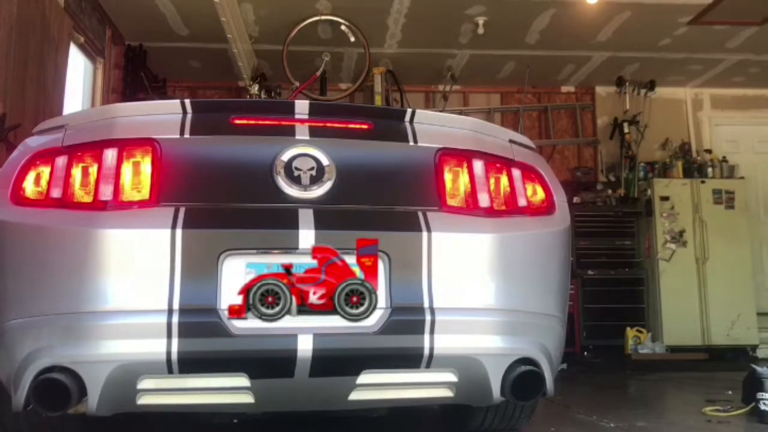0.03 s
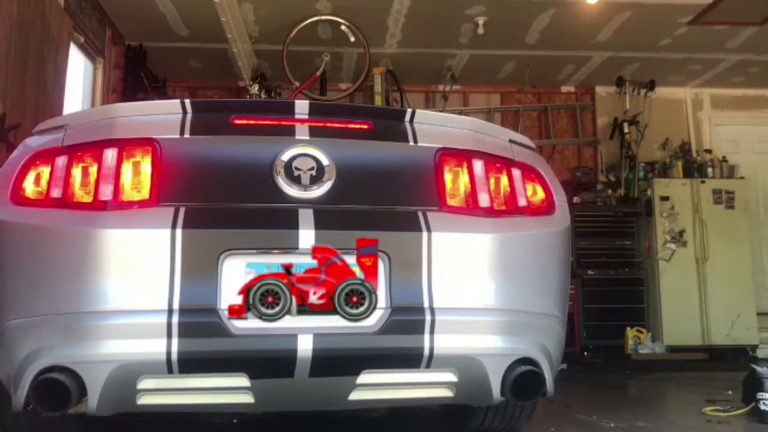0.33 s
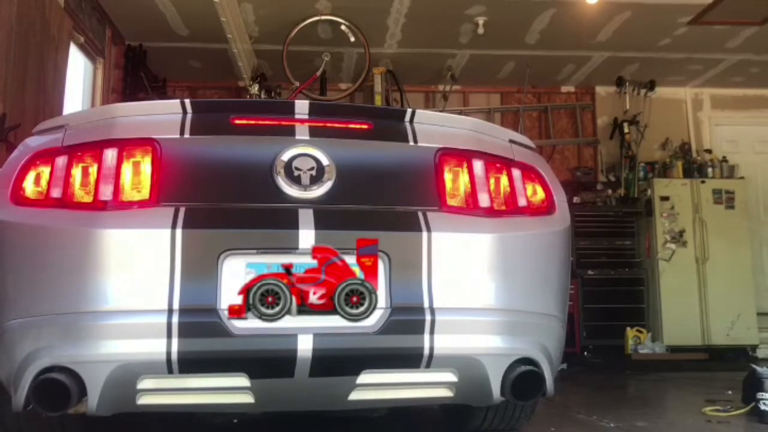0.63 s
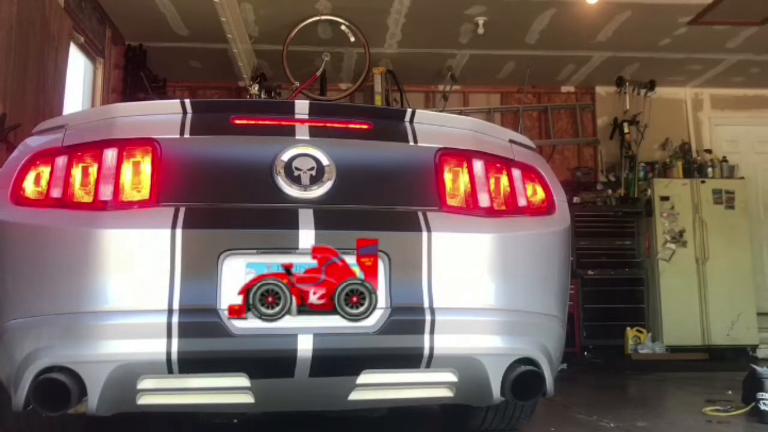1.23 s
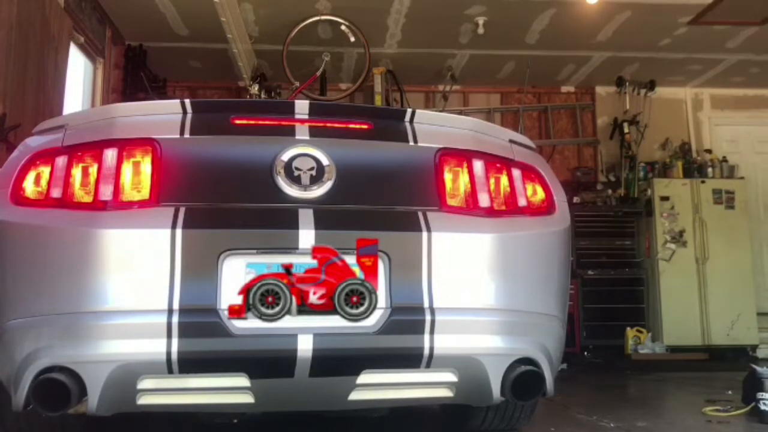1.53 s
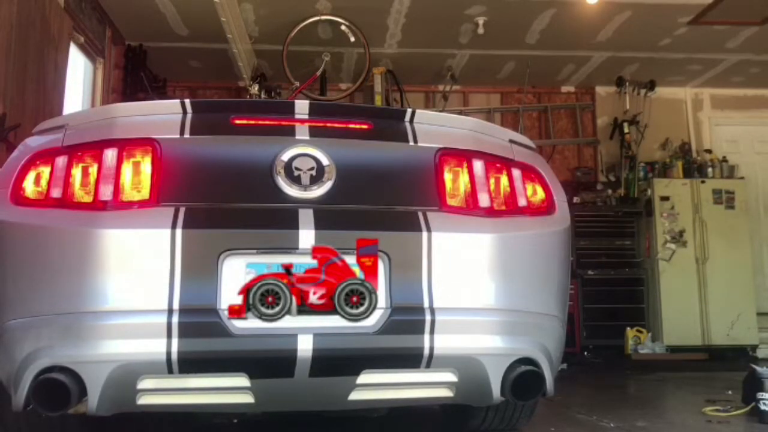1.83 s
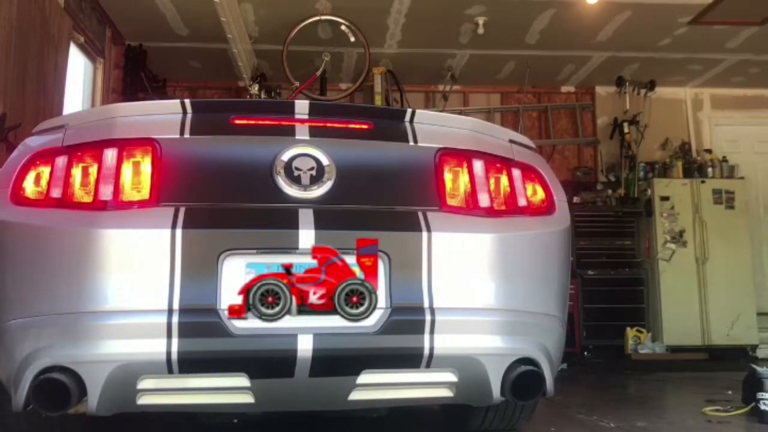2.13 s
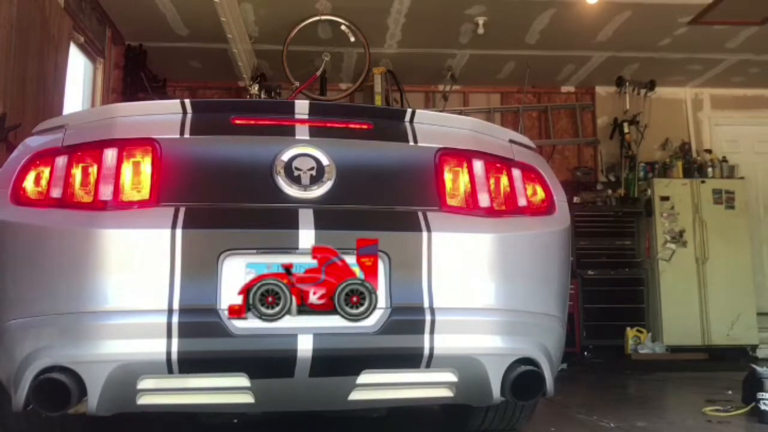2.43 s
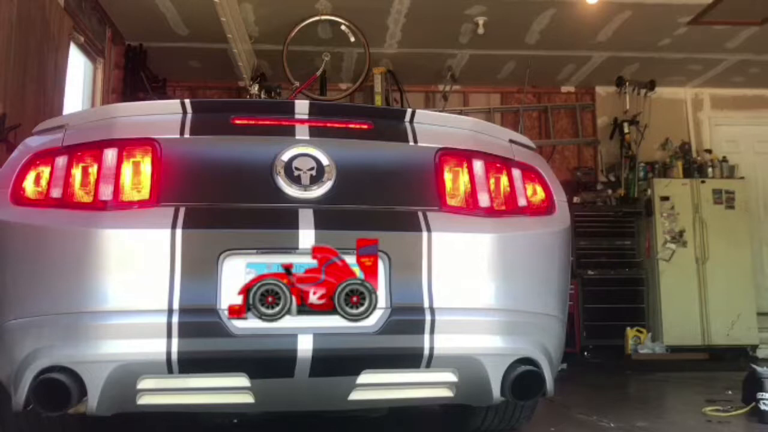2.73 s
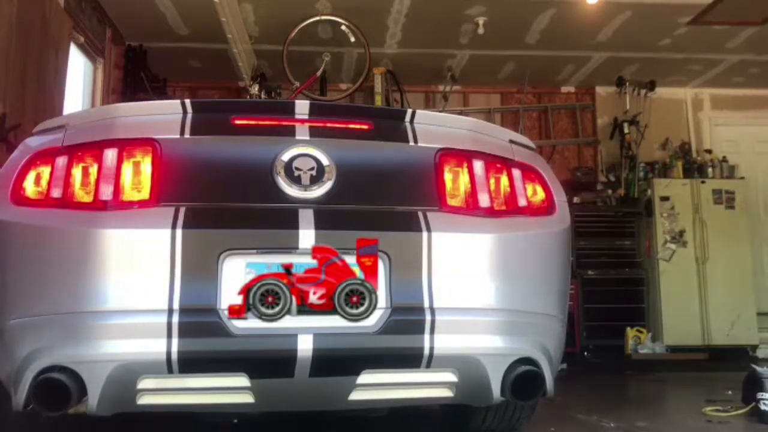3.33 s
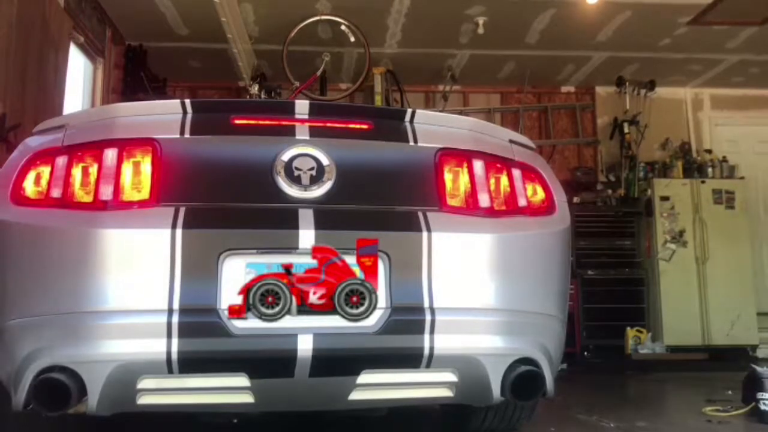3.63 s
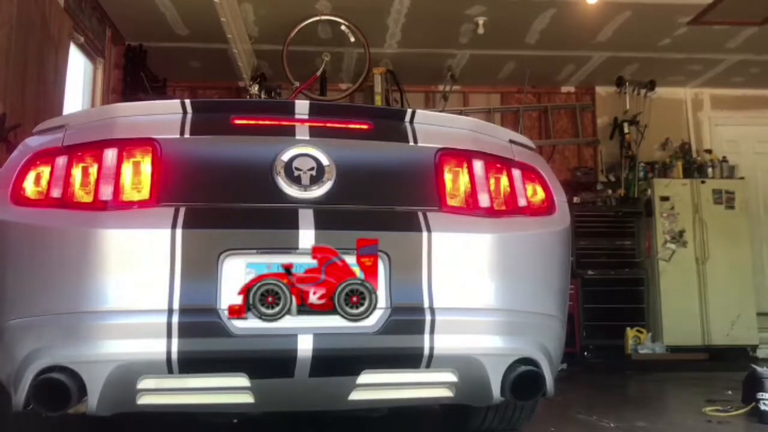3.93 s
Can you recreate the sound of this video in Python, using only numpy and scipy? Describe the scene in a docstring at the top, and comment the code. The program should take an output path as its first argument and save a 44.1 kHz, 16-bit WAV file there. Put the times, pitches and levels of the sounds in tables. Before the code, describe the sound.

A V8 car engine cranks and starts with a loud roar in a garage.

```python
"""A relay clicks over a low room rumble and a fuel pump primes: a V8's cold start in a garage,
heard from behind its tailpipes. The starter slams in and grinds through seven compressions.
The engine catches with a boom and a spit of gas, flares to the point of overload and sinks towards
a lumpy fast idle. Each firing is a pulse that rings pipes and silencer and lets out a noisy puff."""
import sys
import numpy as np
from scipy import signal
from scipy.fft import rfft, irfft
from scipy.io import wavfile
from scipy.ndimage import uniform_filter1d

SR = 44100
rng = np.random.default_rng(int(sys.argv[2]) if len(sys.argv) > 2 else 0)


def transcribe(u):
    """Save the signal u as a 16-bit wav file named by the first command-line argument.

    u: samples, shape (n,) or (channels, n), limited to [-1, 1]; the rate is SR.
    q: integer samples, one column per channel.
    """
    v = np.clip(np.atleast_2d(u).T, -1, 1)
    q = np.round(v * 32767).astype(np.int16)
    wavfile.write(sys.argv[1], SR, q)


N = 176400
T = np.arange(N) / SR

# room rumble: freq_hz, gain_db
ROOM_SPECTRUM = [(20, -43), (32, -9), (55, 0), (80, 0.5), (130, -10.5), (200, -18), (290, -22), (400, -17),
                 (560, -25.5), (750, -29.5), (1100, -32), (2000, -40), (3750, -36.5), (7500, -45),
                 (15500, -54.5)]
# room rumble: time_s, level_db
ROOM_LEVEL = [(0, -50.5), (1.4, -57.5), (1.7, -53), (2.3, -55)]
# steady hum: pitch_hz, level_db
HUM_PARTIALS = [(91.5, -60), (150.7, -68), (231.5, -71.5), (274.5, -67.5), (306.8, -71), (554.5, -75)]
# faint squeaks: start_s, length_s, start_pitch_hz, level_db
SQUEAKS = [(0.049, 0.34, 4360, -69.5), (.07, .08, 6160, -70), (0.348, 0.068, 6200, -63),
           (1.72, 0.24, 4440, -66)]

# relay and valve clicks: start_s, level_db
RELAY_CLICKS = [(.334, -51.5), (.42, -54.5), (1.503, -51)]
# one click: freq_hz, gain_db
RELAY_SPECTRUM = [(200, -9), (400, -1), (540, 7.5), (750, -1.5), (1200, -3.5), (2300, -10.5), (4000, -16),
                  (12000, -30)]
# fuel flow: freq_hz, gain_db
FUEL_SPECTRUM = [(180, -49), (300, -28), (372, 1), (404, -7), (468, -4), (781, -11), (1490, -8),
                 (1620, -11), (2040, -9.5), (3280, -9), (4070, -3), (5130, -8.5), (10400, -14),
                 (13100, -14.5), (15500, -23)]
# pump resonances: freq_hz, width_hz, gain_db
PUMP_MODES = [(2040, 77, 3), (4120, 170, 0)]
# soft thumps in the body: start_s, level_db
BODY_THUMPS = [(1.25, -48.5), (1.42, -44)]

# compressions loading the starter: centre_s, boost_db
COMPRESSIONS = [(2.35, 4), (2.458, 4), (2.566, 6), (2.676, 2), (2.757, 7), (2.84, 8), (2.926, 7)]
# starter gear noise: freq_hz, gain_db
GEAR_SPECTRUM = [(100, -16), (230, -5), (400, -0.5), (750, -3), (1500, -5), (2500, -3.5), (4000, -11.5),
                 (6500, -14.5), (8000, -22), (12500, -24.5), (15500, -39)]
# starter housing resonances: freq_hz, width_hz, gain_db
HOUSING_MODES = [(383, 43, 7), (980, 110, -10), (1474, 39, -4), (1950, 81, 2), (2360, 93, 1),
                 (3250, 230, -4.5)]
# pinion impact: freq_hz, gain_db
CLASH_SPECTRUM = [(80, -32.5), (140, 15), (230, -12), (400, 2), (1500, 1.5), (2700, 9.5), (4000, -4),
                  (6000, -2.5), (9000, -8), (15500, -12)]
# air pumped through the pipes while cranking: time_s, level_db
CRANKING_AIR = [(2.32, -69), (2.5, -50), (2.55, -35.5), (2.72, -33.5), (2.8, -38.5), (2.92, -36.5),
                (2.98, -21), (3.03, -37)]

# crankshaft from the first firing on: time_s, speed_rpm
CRANK_SPEED = [(2.988, 509.0), (3.04, 719.0), (3.14, 1336.0), (3.23, 1678.0), (3.32, 1735.0),
               (3.45, 1722.0), (3.6, 1641.0), (3.72, 1507.0), (3.83, 1454.0), (4.0, 1383.0)]
# cylinders in firing order, at full imbalance: gain_db
CYLINDERS_DB = [-12, 1, 0, -3, -10, -3, 2, -3]
# imbalance rises, peaks and eases: time_s
IMBALANCE_TIMES_S = [3.18, 3.32, 3.6, 3.8]
# exhaust layers before trim: time_s, boom_db, drone_db, bark_db, rasp_db, hiss_db
EXHAUST_LEVELS = [(2.98, -23, -35, -34, -34, -38), (2.988, -32, -51, -33, -47, -34),
                  (3.008, -13.5, -8, -26, -35, -33), (3.014, -14.5, -25.5, -23.5, -40.5, -27.5),
                  (3.07, -8.5, -20, -10, -29, -26.5), (3.092, -10.5, -8.5, -10, -27, -29),
                  (3.118, -18, -10.5, -10.5, -39, -25), (3.186, -15, -23.5, -4.5, -20, -36.5),
                  (3.218, -21, -13.5, -10.5, -29, -32.5), (3.302, -34, -18.5, -10, -34, -40),
                  (3.346, -23, -15, -15.5, -36, -42.5), (3.374, -26, -13.5, -13.5, -33.5, -46),
                  (3.596, -27.5, -14, -21, -55, -53.5), (3.7, -28.5, -19.5, -28, -59, -57),
                  (3.892, -28.5, -17.5, -26.5, -54.5, -56), (4.0, -39, -19.5, -31, -57, -61.5)]
# layer trims: boom_db, drone_db, bark_db, rasp_db, hiss_db
EXHAUST_TRIMS_DB = [0.5, 0, 0.34, 1.5, 0.31]
# pipe resonances: freq_hz, width_hz, gain_db
PIPE_MODES = [(237, 42, 0.5), (268, 42, 0), (349, 27, -4.5), (418, 34, 1.5), (471.5, 15, 6), (608, 14, 0),
              (738, 8.1, 3), (888, 11, 10), (1218, 31, 10)]
# low resonances of silencer and garage: freq_hz, width_hz, gain_db
BOOM_MODES = [(54.3, 5.9, 5.5), (67.8, 12.4, 1), (103.1, 4.7, -5.5), (132, 6.3, -2)]
# low pipe drone: freq_hz, gain_db
DRONE_SPECTRUM = [(60, -23.5), (130, -18), (175, -8.5), (240, 0), (350, 1.5), (480, -0.5), (650, -8),
                  (1000, -50)]
# bark of a firing: freq_hz, gain_db
BARK_SPECTRUM = [(120, -15.5), (280, -7.5), (400, 0), (500, 3.5), (620, -6.5), (760, -11), (900, -21.5),
                 (1100, -28), (1400, -33), (3000, -58)]
# gas rasp: freq_hz, gain_db
RASP_SPECTRUM = [(450, -11), (620, 9.5), (800, 7), (1000, 0.5), (1250, 0.5), (1700, -4), (2600, -8.5),
                 (3500, -18.5), (6000, -25.5)]
# gas hiss: freq_hz, gain_db
HISS_SPECTRUM = [(2500, -1), (4400, -12), (5300, 4), (7000, -10), (8600, -2), (10500, -10), (12000, -0.5),
                 (15500, -9.5)]
# sharp exhaust cracks: start_s, level_db
EXHAUST_CRACKS = [(3.149, -16), (3.1805, -7), (3.2903, -13.5)]

# short spectra: freq_hz, gain_db
FLUTTER_SPECTRUM = [(30, -3), (300, -4.5), (900, -25)]
THUMP_SPECTRUM = [(20, -34), (42, -5.5), (95, -8), (200, -25.5), (600, -45)]
SOLENOID_SPECTRUM = [(90, -27), (125, -6), (142, 2), (160, -7), (220, -28.5)]
CRANKING_SPECTRUM = [(45, -8), (75, 5), (100, -9), (150, -12)]
BOOM_BAND = [(40, 0), (150, 0)]
CRACK_SPECTRUM = [(700, -4), (1500, 2), (2700, 7), (4200, -25), (7000, -41)]

FUEL_ON_S, FUEL_OFF_S, THROB_HZ, THROB_DB, THROB_DECAY_S = 0.484, 1.484, 7.9, 4.5, 0.45
MOTOR_HZ, MOTOR_WIDTH_HZ = 76, 14
STARTER_ON_S, STARTER_OFF_S, SOLENOID_S, SOLENOID_DB = 2.312, 3.0, 2.33, -35.5
MESH_HZ, MESH_SAG, TOOTH_JITTER_S, TOOTH_SPREAD_DB = 498, .04, .00009, 4
COMPRESSION_SIGMA_S, AIR_HZ = .02, 53
FIRING_SPREAD_DB, FIRING_JITTER_S, VALVE_LEAD_S = 2.5, 0.0004, 0.001208
GARAGE_T60_S, CUTOFF_HZ = 0.57, 15900


def from_db(db):
    """Decibels to gain."""
    return 10 ** (np.asarray(db) / 20)


def unit_rms(x):
    """Scale to rms 1."""
    return x / np.sqrt(np.mean(x ** 2) + 1e-20)


def hold_rms(x):
    """Hold the running rms near 1."""
    power = uniform_filter1d(x * x, size=3000)
    return x / np.sqrt(np.abs(power) + .01 * np.mean(x * x))


def curves(rows):
    """Each value column of a timed table, at every sample."""
    times_s, *columns = np.transpose(rows)
    return [np.interp(T, times_s, column) for column in columns]


def colour(x, spectrum):
    """Minimum-phase filter; falls 28.4 dB an octave beyond the spectrum's ends."""
    size = 2 ** 14
    hz, db = np.transpose(spectrum)
    octave = np.log2(np.maximum(np.arange(size // 2 + 1) * SR / size, 1))
    beyond = np.maximum(np.log2(hz[0]) - octave, 0) + np.maximum(octave - np.log2(hz[-1]), 0)
    gain_db = np.interp(octave, np.log2(hz), db) - 28.4 * beyond
    cepstrum = irfft(np.log(from_db(gain_db)))
    cepstrum[1:size // 2] *= 2  # fold onto positive time
    cepstrum[size // 2 + 1:] = 0
    return signal.fftconvolve(x, irfft(np.exp(rfft(cepstrum))))[:N]


def noise(spectrum):
    """Coloured noise of rms 1."""
    return unit_rms(colour(rng.standard_normal(N), spectrum))


def resonate(x, modes):
    """Parallel two-pole resonances."""
    out = 0
    for hz, width_hz, db in modes:
        r = np.exp(-np.pi * width_hz / SR)
        poles = [1, -2 * r * np.cos(2 * np.pi * hz / SR), r * r]
        out = out + from_db(db) * (1 - r * r) / 2 * signal.lfilter([1, 0, -1], poles, x + 1e-18)
    return out


def impulses(times_s, gains):
    """One impulse at each time."""
    return np.bincount(np.clip(times_s * SR, 0, N).astype(int), gains, N + 1)[:N]


def die_away(x, decay_s):
    """Each impulse becomes an exponential decay."""
    return signal.lfilter([1], [1, -np.exp(-1 / (decay_s * SR))], x + 1e-18)


def bursts(events, spectrum, decay_s):
    """Decaying bursts of coloured noise."""
    start_s, level_db = np.transpose(events)
    return die_away(impulses(start_s, from_db(level_db)), decay_s) * noise(spectrum)


def gate(on_s, off_s, attack_s, release_s):
    """Linear attack, hold, exponential release."""
    return np.clip((T - on_s) / attack_s, 0, 1) * np.exp(-np.maximum(T - off_s, 0) / release_s)


def garage(x, wet_db):
    """Direct sound plus a diffuse tail after 8 ms."""
    t = T[:SR // 2]
    tail = rng.standard_normal(len(t)) * from_db(-60 * t / GARAGE_T60_S) * (t > .008)
    return x + from_db(wet_db) * signal.fftconvolve(x, tail / np.linalg.norm(tail))[:N]


def treble_ripple(x, decay_s=.012, above_hz=3000):
    """A short random filter gives the treble a faint ringing colour."""
    t = T[:SR // 20]
    kernel = rng.standard_normal(len(t)) * np.exp(-t / decay_s)
    treble = signal.sosfilt(signal.butter(2, above_hz, "high", fs=SR, output="sos"), x)
    return 0.73 * x + .35 * signal.fftconvolve(treble, kernel / np.linalg.norm(kernel))[:N]


def background():
    """Low room rumble, a steady hum and faint falling squeaks."""
    hum = sum(from_db(db) * np.sqrt(2) * np.sin(2 * np.pi * (hz * T + rng.random()))
              for hz, db in HUM_PARTIALS)
    out = noise(ROOM_SPECTRUM) * from_db(curves(ROOM_LEVEL)[0]) + hum
    flutter = noise(FLUTTER_SPECTRUM)
    for start_s, length_s, start_hz, db in SQUEAKS:
        progress = np.clip((T - start_s) / length_s, 0, 1)
        pitch_hz = start_hz * (1 - 0.26 * progress)
        tone = np.sin(2 * np.pi * np.cumsum(pitch_hz) / SR)
        out += from_db(db) * np.sin(np.pi * progress) * flutter * tone
    return out


def priming():
    """Relays click, the body thumps; the fuel pump drones and hisses, throbbing until pressure is up."""
    age_s = np.maximum(T - FUEL_ON_S, 0)
    throb_db = THROB_DB * np.exp(-age_s / THROB_DECAY_S) * np.sin(2 * np.pi * THROB_HZ * (age_s - .02))
    flow = noise(FUEL_SPECTRUM)
    hiss = from_db(-55 + throb_db) * unit_rms(treble_ripple(flow + resonate(flow, PUMP_MODES)))
    hiss *= gate(FUEL_ON_S, FUEL_OFF_S, attack_s=0.0057, release_s=0.038)
    motor = from_db(-53.5) * unit_rms(resonate(rng.standard_normal(N), [(MOTOR_HZ, MOTOR_WIDTH_HZ, 0)]))
    motor *= gate(FUEL_ON_S, FUEL_OFF_S, attack_s=0.036, release_s=.03)
    clicks = bursts(RELAY_CLICKS, RELAY_SPECTRUM, decay_s=0.049)
    thumps = bursts(BODY_THUMPS, THUMP_SPECTRUM, decay_s=0.14)
    return hiss + motor + clicks + thumps


def starter_gears():
    """Teeth rattle the housing, louder and slower at each compression."""
    load_db = sum(db * np.exp(-.5 * ((T - s) / COMPRESSION_SIGMA_S) ** 2) for s, db in COMPRESSIONS)
    tooth_count = np.cumsum(MESH_HZ * (1 - MESH_SAG * load_db / load_db.max())) / SR
    tooth_s = np.interp(np.arange(int(tooth_count[-1])), tooth_count, T)
    jitter, spread = rng.standard_normal((len(tooth_s), 2)).T
    strikes = impulses(tooth_s + TOOTH_JITTER_S * jitter, from_db(TOOTH_SPREAD_DB * spread))
    whine = from_db(-33.5) * unit_rms(colour(strikes, GEAR_SPECTRUM))
    grind = from_db(-30.5) * noise(GEAR_SPECTRUM)
    drive = (whine + grind) * from_db(load_db)
    drive *= gate(STARTER_ON_S, STARTER_OFF_S, attack_s=0.022, release_s=0.2)
    return garage(drive + resonate(drive, HOUSING_MODES), wet_db=-3) / 2


def starter():
    """The pinion slams in, the solenoid thuds; the cranked engine rumbles and pumps air."""
    gears = starter_gears()
    clash = from_db(-26.5) * noise(CLASH_SPECTRUM)
    clash *= gate(STARTER_ON_S, STARTER_ON_S + 0.034, attack_s=0.0067, release_s=0.045)
    air = from_db(curves(CRANKING_AIR)[0]) * np.sqrt(2) * np.sin(2 * np.pi * AIR_HZ * T)
    air *= gate(STARTER_ON_S, STARTER_OFF_S, attack_s=.02, release_s=0.067)
    rumble = from_db(-44.5) * noise(CRANKING_SPECTRUM)
    rumble *= gate(STARTER_ON_S, STARTER_OFF_S, attack_s=0.067, release_s=.05)
    thud = bursts([(SOLENOID_S, SOLENOID_DB)], SOLENOID_SPECTRUM, decay_s=0.062)
    return treble_ripple(gears + clash) + air + rumble + thud


def firing_pulses(running):
    """Four pulses a crank turn, uneven in time and strength."""
    firing_count = np.cumsum(curves(CRANK_SPEED)[0] * running) * 4 / 60 / SR
    index = np.arange(int(firing_count[-1]) + 1)
    jitter, spread = rng.standard_normal((len(index), 2)).T
    firing_s = np.interp(index, firing_count[running], T[running]) + FIRING_JITTER_S * jitter
    imbalance = np.interp(firing_s, IMBALANCE_TIMES_S, [0.17, 1, 0.63, 0.31])
    gain_db = imbalance * np.resize(CYLINDERS_DB, len(index)) + FIRING_SPREAD_DB * spread
    return impulses(firing_s - VALVE_LEAD_S, from_db(gain_db))


def engine():
    """Firings ring pipes and silencer and puff out rasping, hissing gas; the exhaust cracks sharply."""
    running = T >= CRANK_SPEED[0][0]
    pulses = firing_pulses(running)
    pipes = garage(-pulses - resonate(pulses, PIPE_MODES), wet_db=-5.5)
    gas_flow = die_away(pulses, decay_s=0.0031) + .15 * running
    boom = resonate(colour(-pulses, BOOM_BAND), BOOM_MODES)
    drone = colour(pipes, DRONE_SPECTRUM)
    bark = colour(pipes, BARK_SPECTRUM)
    rasp = garage(treble_ripple(gas_flow * noise(RASP_SPECTRUM)), wet_db=-0.5)
    hiss = garage(treble_ripple(gas_flow * noise(HISS_SPECTRUM)), wet_db=-0.5)
    layers = zip([boom, drone, bark, rasp, hiss], curves(EXHAUST_LEVELS), EXHAUST_TRIMS_DB)
    exhaust = sum(hold_rms(layer) * from_db(db + trim_db) for layer, db, trim_db in layers)
    return exhaust + bursts(EXHAUST_CRACKS, CRACK_SPECTRUM, decay_s=0.0011)


def scene():
    """All sources, mono."""
    return (engine() + starter() + priming() + background())[None]


def record(dry):
    """Soft clip at full scale, then a steep low-pass."""
    clipped = dry / (1 + dry ** 8) ** (1 / 8)
    return signal.sosfilt(signal.ellip(12, .1, 80, CUTOFF_HZ, fs=SR, output="sos"), clipped)


dry = scene()
out = record(dry)
transcribe(out)
```